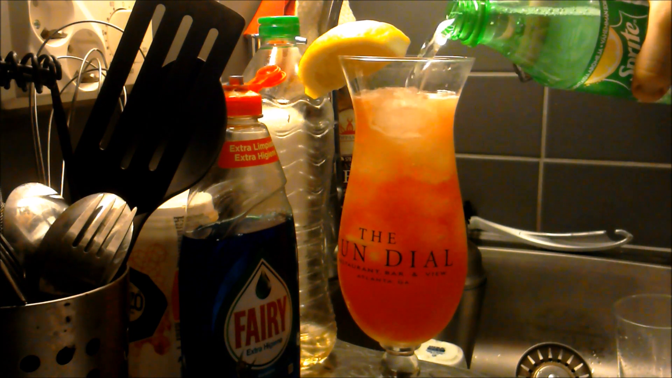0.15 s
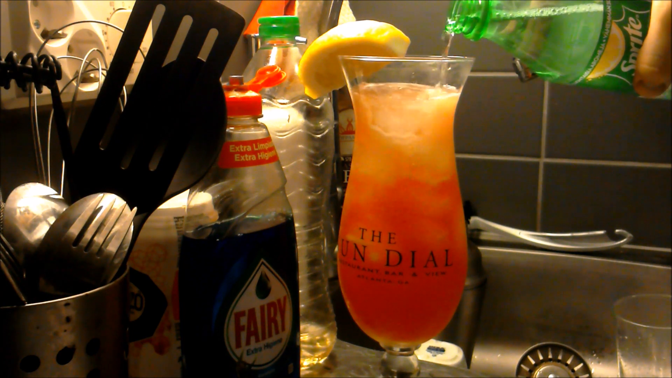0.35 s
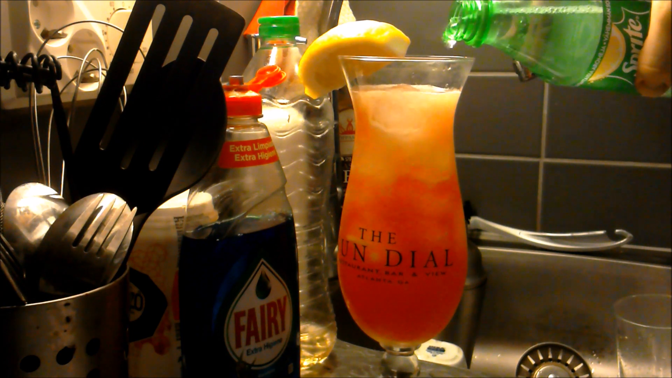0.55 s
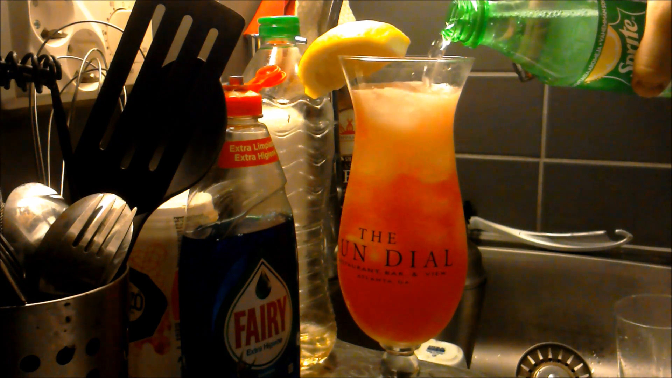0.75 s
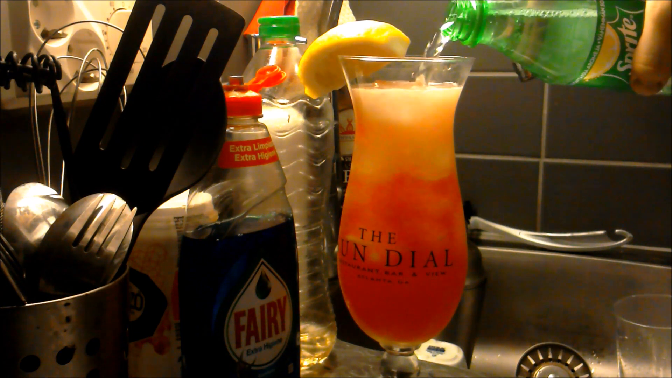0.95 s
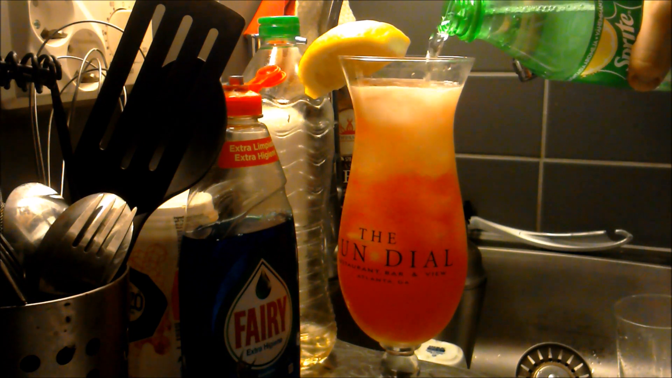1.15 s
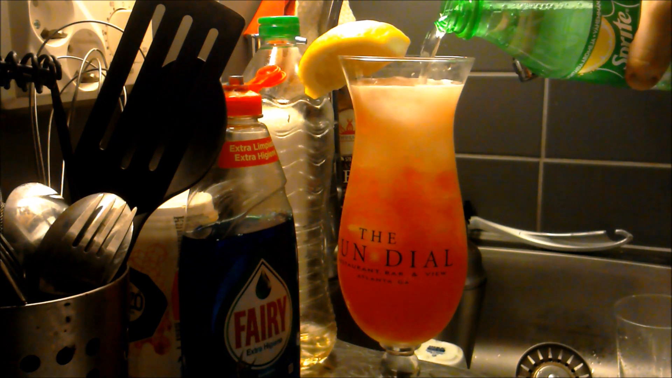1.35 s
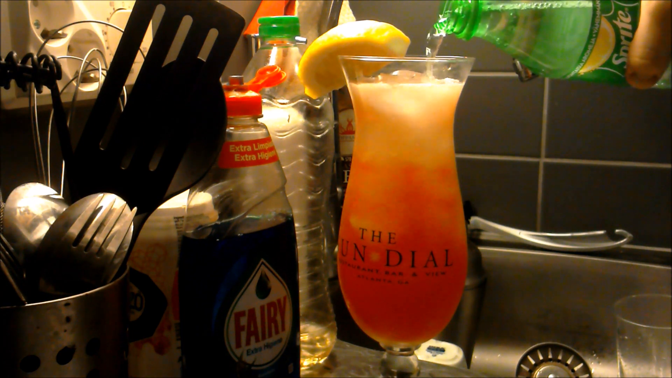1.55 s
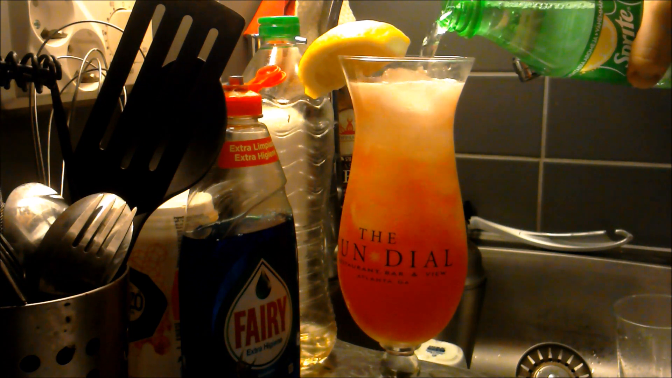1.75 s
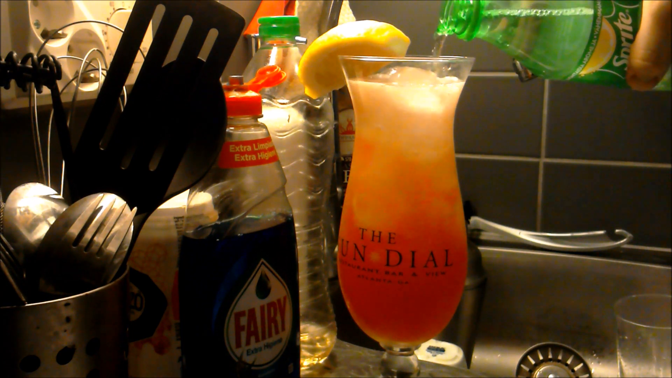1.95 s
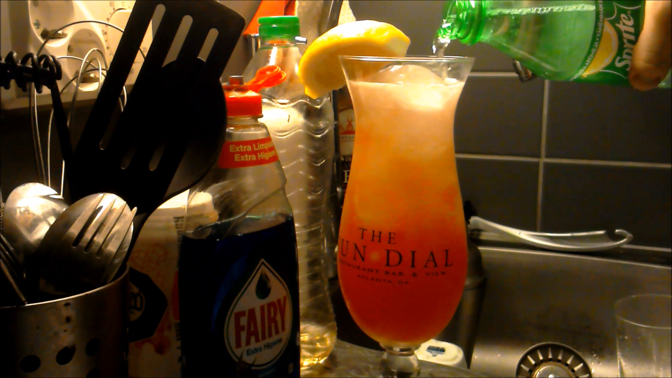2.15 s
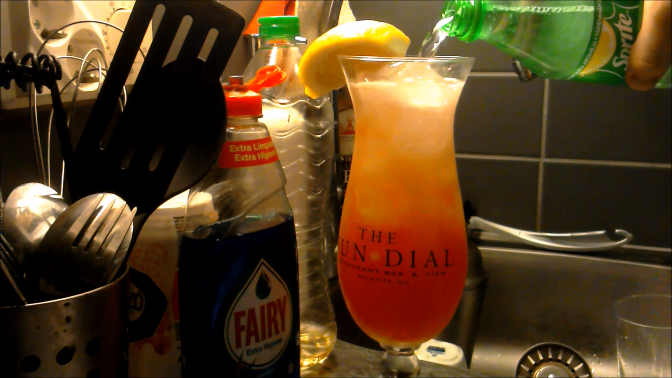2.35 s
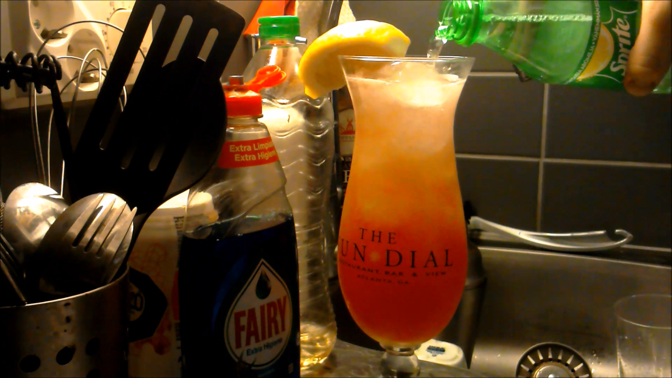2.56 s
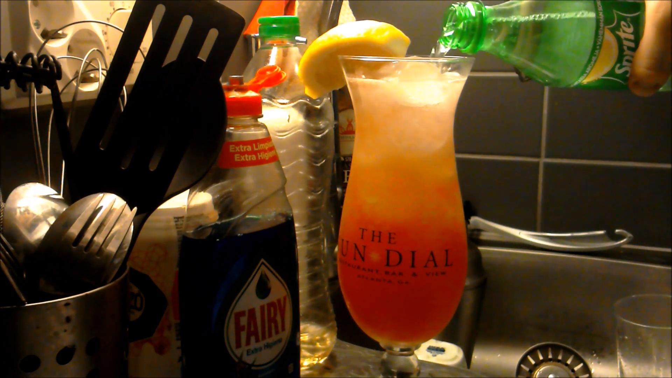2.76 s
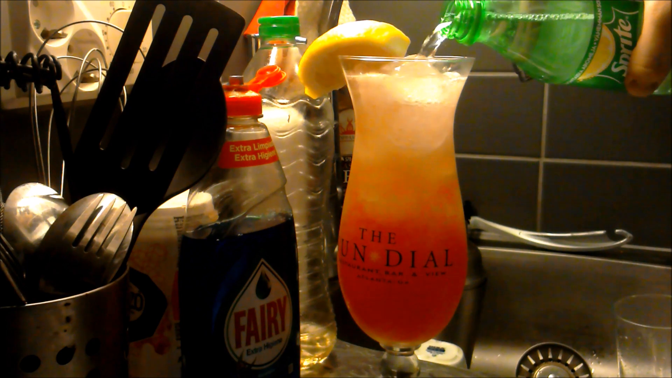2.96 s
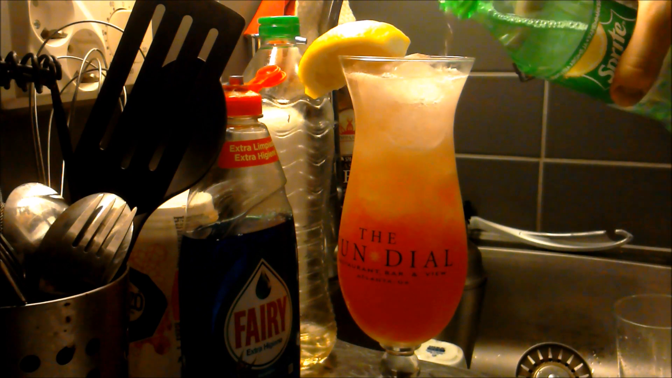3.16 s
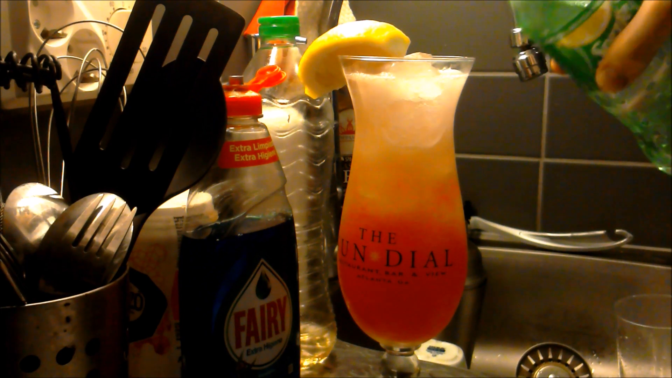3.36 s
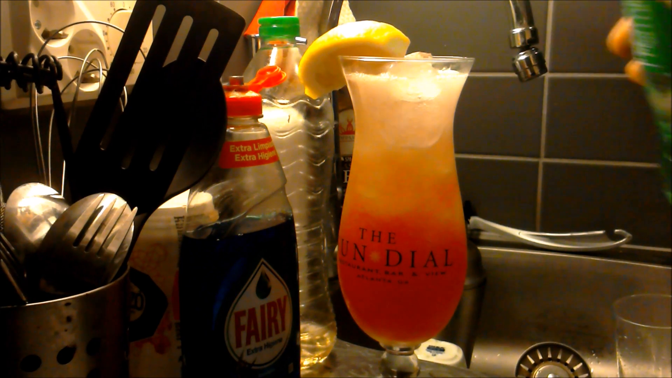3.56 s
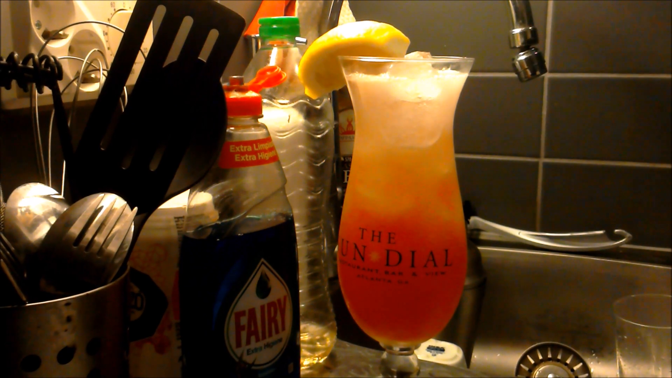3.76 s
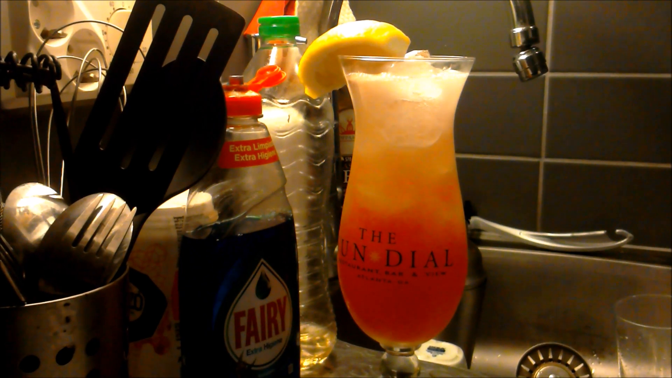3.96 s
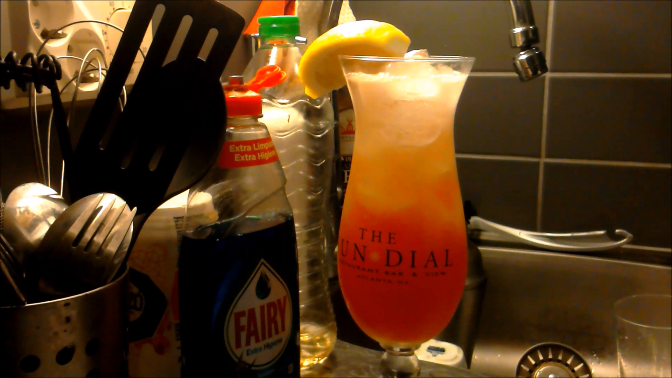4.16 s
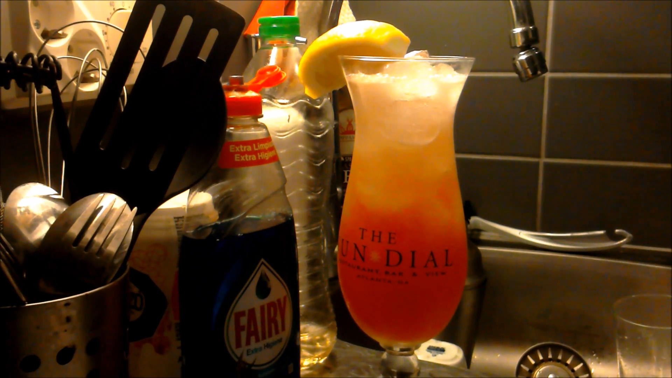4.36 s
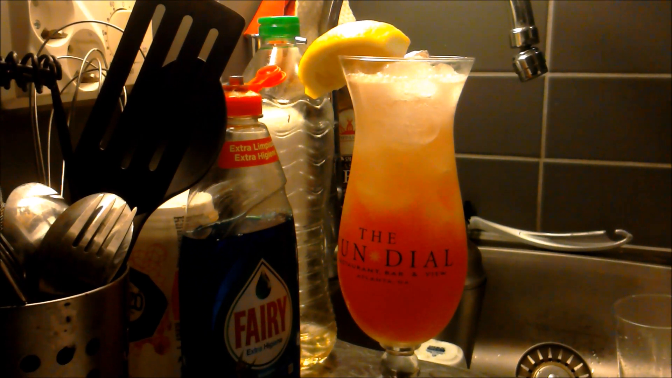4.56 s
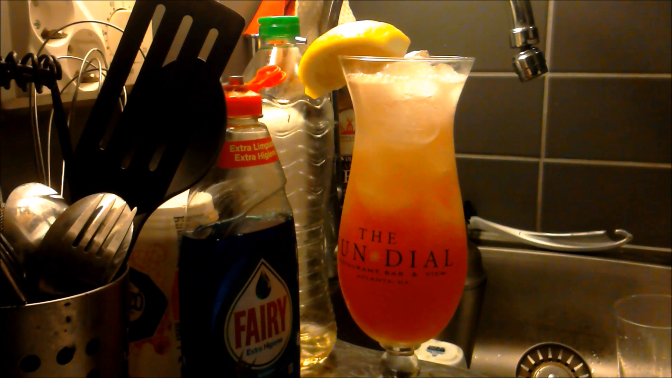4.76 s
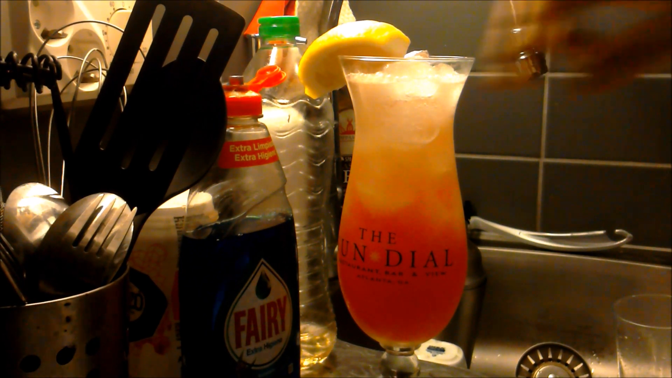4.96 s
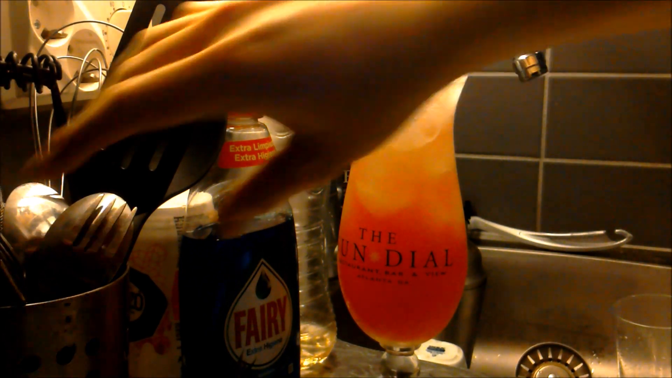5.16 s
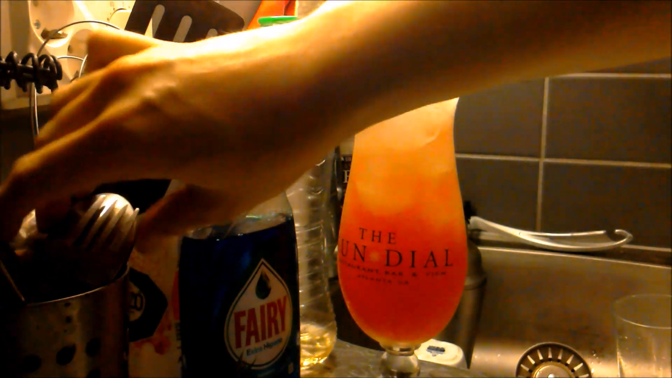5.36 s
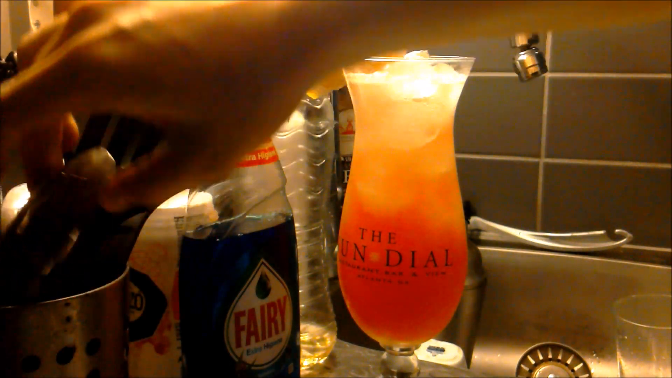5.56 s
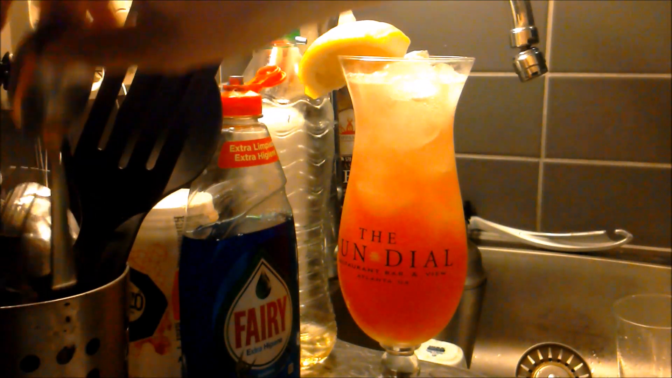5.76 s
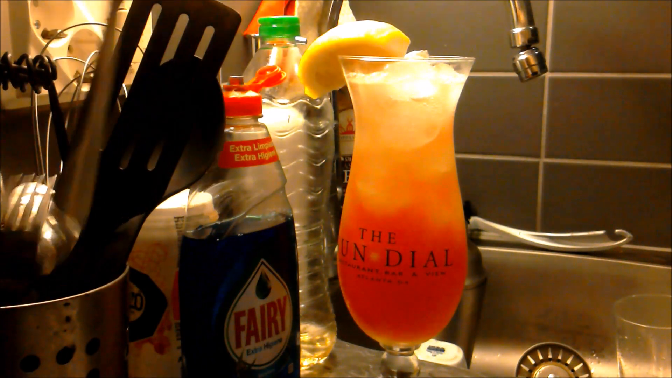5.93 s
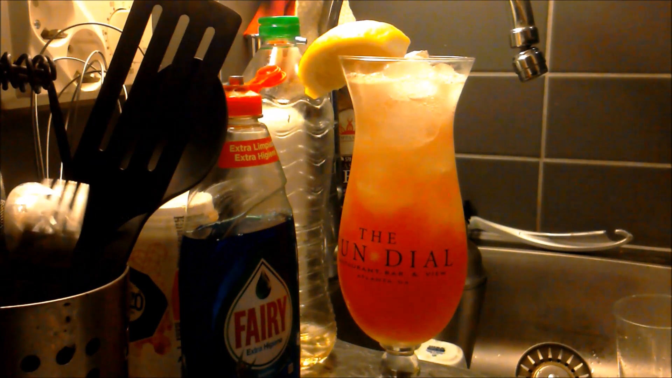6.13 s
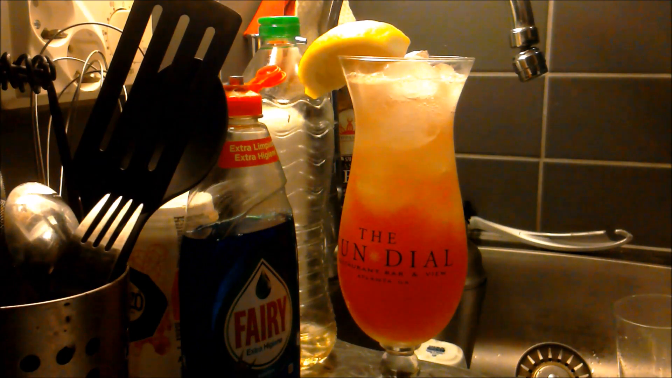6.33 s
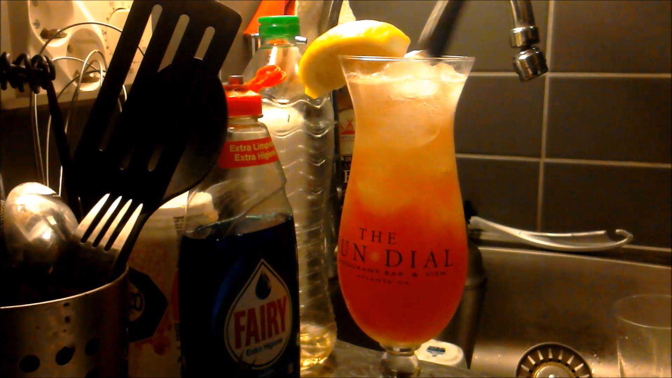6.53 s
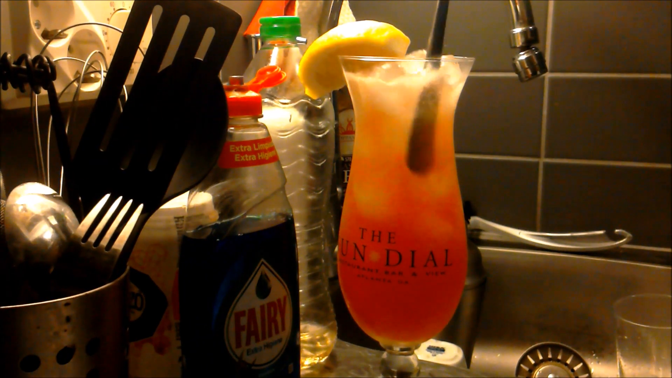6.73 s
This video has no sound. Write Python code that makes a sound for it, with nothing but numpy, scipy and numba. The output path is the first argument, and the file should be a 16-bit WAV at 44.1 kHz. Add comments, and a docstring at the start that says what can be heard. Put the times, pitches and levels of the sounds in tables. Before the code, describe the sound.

Quiet glugging of a soft drink over ice, a couple of thuds, a harsh bright rattle of steel utensils, then a stirrer jabbing into ice cubes.

```python
"""A fizzy drink glugs from a bottle into a tall glass of ice by a kitchen sink: noise splash and gliding rings.
Soft bumps come through the cupboards, the bottle is set down and the ice settles: ringing panels and clinks.
A hand pulls a steel utensil out of a crowded pot; the cutlery scrapes, rings and drops back: noise through
hundreds of modes, and free decaying sines. Last, the utensil is pushed down among the ice cubes.
Fizz and hum lie under it all; a close microphone clips the loudest moments."""
import sys
import numpy as np
from scipy import signal
from scipy.fft import rfft, irfft, next_fast_len
from scipy.io import wavfile
from scipy.ndimage import uniform_filter1d
from numba import njit

SR = 44100
rng = np.random.default_rng(int(sys.argv[2]) if len(sys.argv) > 2 else 0)


def unload_wav(signal):
    """Save mono or channel-first audio to the path in sys.argv[1] as 16-bit WAV at rate SR, clipped to [-1, 1]."""
    wavfile.write(
        sys.argv[1],
        SR,
        np.round(np.clip(np.atleast_2d(signal).T, -1, 1) * 32767).astype(np.int16),
    )


N = 303849
T = np.arange(N) / SR

# knock spectrum of a hard top: f/Hz, relative level/dB
HARD_KNOCK = [(150, -1), (400, 4), (900, 0.5), (1500, -14), (3000, -21.5), (12000, -33)]
# modes of the free utensil: f/Hz, relative level/dB, full ring t60/s
STEEL = [(2900, -19, .09), (3680, -18, 0.27), (4275, -11, .25), (5582, -12, 0.35), (6541, -11, 0.4),
         (7784, -7, 0.4), (8909, 2, 0.1), (9243, -5, 0.12), (10170, -4, 0.25), (10720, -9, 0.45),
         (11630, -4, .2), (13090, -3, .16), (14590, -20, 0.25), (15500, -9, 0.28)]
# sliding steel: t/s, level/dB
SCRAPE = [(5.35, -74), (5.38, -23.5), (5.408, -17.5), (5.43, -22), (5.46, -20), (5.494, -16.5),
          (5.56, -11.5), (5.59, -9), (5.6, -17.5), (5.63, -15), (5.695, -13), (5.735, -38), (5.85, -40)]


def undb(db):
    """Decibels to amplitude."""
    return 10 ** (np.asarray(db) / 20)


def curve(rows, edge_db=None):
    """A (t/s, level/dB) envelope at every sample; edge_db applies outside its span."""
    t, db = np.transpose(rows)
    return np.interp(T, t, db, edge_db, edge_db)


def colour(x, points):
    """Equalises x through (f/Hz, level/dB) points, then sets its rms to 1."""
    hz, db = np.transpose(points)
    size = next_fast_len(len(x))
    f = np.maximum(np.arange(size // 2 + 1) * SR / size, 1)
    gain = undb(np.interp(np.log(f), np.log(hz), db))
    y = irfft(rfft(x, size) * gain, size)[:len(x)]
    return y / np.std(y)


def split(x, hz):
    """The parts below and above hz, each at rms 1."""
    low = signal.lfilter(*signal.butter(2, hz, fs=SR), x)
    high = signal.lfilter(*signal.butter(2, hz, "high", fs=SR), x)
    return low / np.std(low), -high / np.std(high)  # opposite sign: the parts join without a notch


def walk(rate):
    """A wandering level: random values, rate per second, slewed into one another."""
    k = int(SR / rate)
    steps = np.repeat(rng.standard_normal(N // k + 1), k)
    return 1.2 * uniform_filter1d(steps, k)[:N]


@njit
def rings(n, sr, s, hz, gain, t60, glide, phase):
    """Decaying sines; glide is the fractional pitch rise over t60."""
    out = np.zeros(n)
    for k in range(len(s)):
        start, length = int(s[k] * sr), int(t60[k] * sr)
        w = 2 * np.pi * hz[k] / sr
        p = np.exp(1j * w - np.log(1000.) / length)
        turn = np.exp(1j * w * glide[k] / length)
        z = gain[k] * np.exp(1j * phase[k])
        for i in range(start, min(n, start + length)):
            out[i] += z.imag
            z *= p
            p *= turn
    return out


def ring(s, hz, db, t60, glide=0., phase=0.):
    """Sums decaying sines over every combination of the broadcast settings."""
    settings = np.broadcast_arrays(s, hz, db, t60, glide, phase)
    s, hz, db, t60, glide, phase = (np.ravel(a) * 1. for a in settings)
    return rings(N, 1. * SR, s, hz, undb(db), np.maximum(t60, .002), glide, phase)


def bursts(noise, s, db, t60, rise_s):
    """Puffs of the noise that rise fast and die away by 60 dB over t60."""
    out = np.zeros(N)
    for start, level_db, decay in zip(s, db, np.broadcast_to(t60, np.shape(s))):
        i = int(start * SR)
        t = T[:min(N - i, int(decay * SR) + 9)]
        envelope = undb(level_db - 60 * t / decay) * (1 - np.exp(-t / rise_s))
        out[i:i + len(t)] += noise[i:i + len(t)] * envelope
    return out


def bubbles(rows, count, low_hz, octaves, spread_db, cycles):
    """A shower of small bubbles, each gliding up in pitch, whose levels follow a (t/s, level/dB) envelope."""
    chance = rng.random((count, 3)).T
    s = rows[0][0] + (rows[-1][0] - rows[0][0]) * chance[0]
    hz = low_hz * 2 ** (octaves * chance[1])
    db = curve(rows)[np.minimum(s * SR, N - 1).astype(int)]
    db = db - spread_db * np.log(np.maximum(chance[2], .05))  # a few stand out louder
    return ring(s, hz, db, cycles / hz, glide=0.6)


def thud(blows, modes, knock, rise_s, knock_t60):
    """Soft blows on a panel: its modes ring and a dull knock dies away over them."""
    s, db, knock_db, free = np.transpose(blows)
    hz, mode_db, mode_t60 = np.transpose(modes)
    phase = np.pi * np.arange(len(hz))  # neighbouring modes start in opposite sense
    body = ring(s[:, None], hz, db[:, None] + mode_db, mode_t60 * free[:, None], phase=phase)
    push = np.hanning(int(rise_s * SR))  # a soft contact pushes for a while
    body = np.convolve(body, push / push.sum())[:N]
    noise = colour(rng.standard_normal(N), knock)
    return body + bursts(noise, s, db + knock_db, knock_t60 * free, rise_s)


def bed():
    """Fine bubbles burst on the drink as grainy noise, over the low hum of the room."""
    # spectrum of the bursting bubbles: f/Hz, relative level/dB
    fizz_spectrum = [(530, -5.5), (1420, -7.5), (2070, -7.5), (3780, -5), (4500, -4), (4830, 1),
                     (5300, -4.5), (6400, 0.5), (7100, -3), (7850, 0.5), (8900, -2), (9800, 2),
                     (10800, -.5), (11700, 1.5), (13300, -5.5), (15800, -2)]
    # spectrum of the room hum: f/Hz, relative level/dB
    hum_spectrum = [(12, -55), (20, 10), (98, 7.5), (151, -0.5), (188, 4), (221, -30), (285, -5.5),
                    (341, -28), (439, -3), (566, -16), (702, -12.5), (1370, -16), (1500, -23), (1950, -48),
                    (3300, -120)]
    # slow balance of the hum: t/s, level/dB
    hum_level = [(.4, 2), (1.0, 0), (1.3, -2.5), (2.2, 3.5), (2.9, -3), (3.3, -7.5), (5.2, -2.5),
                 (6.0, 13.5), (6.5, -3)]
    # the bed steps to a new level, holds, then sags: t/s, level/dB, hold/s
    openings = [(0, -86.5, 0.89), (0.666, -62.5, 0.11), (0.829, -61, 0.12), (0.982, -56.5, .01),
                (1.147, -57, 1.26), (2.617, -57, 0.45), (3.187, -54.5, 0.026), (3.323, -58.5, 0.21),
                (3.602, -53, 2), (5.26, -54.5, 2)]
    sag_db_per_s = 65
    current = np.searchsorted(np.array(openings)[1:, 0], T)
    opens, db, holds = np.transpose(openings)[:, current]
    grain_db = 0.68 * rng.exponential(size=N // 40 + 1).repeat(40)[:N]
    pops = rng.standard_normal(N) * undb(grain_db)
    fizz = colour(pops, fizz_spectrum) * undb(3.5 + 0.3 * walk(16))
    hum = colour(rng.standard_normal(N), hum_spectrum) * undb(2 * walk(3.72) + curve(hum_level))
    sag_db = sag_db_per_s * np.maximum(T - opens - holds, 0)
    return (fizz + hum) * undb(db - sag_db)


def cupboard():
    """Heavy, soft bumps come through the cupboards: low panel modes and a muffled knock."""
    # bumps: t/s, level/dB, knock against level/dB, share of the full ring time
    bumps = [(1.14, -41, -26, 0.35), (1.19, -53, -20, 1), (2.609, -21, -10, 1), (2.637, -24, -13.5, 0.62)]
    # cupboard modes: f/Hz, relative level/dB, full ring t60/s
    modes = [(44.7, -8.5, 0.78), (71.4, -17, 0.69), (102, -17, 0.74), (126.6, 1, 0.45), (165.5, 2.5, 0.35),
             (319, 2, 0.25), (416, 7, 0.37), (840, 9, .2)]
    # knock spectrum of a soft cupboard: f/Hz, relative level/dB
    soft_knock = [(150, 3.5), (400, 5.5), (800, -8), (1100, -24.5), (1600, -29), (12000, -73)]
    return thud(bumps, modes, soft_knock, rise_s=0.0058, knock_t60=0.37)


def worktop():
    """The bottle set down and the jolted glass excite the modes of the worktop with a hard knock."""
    # blows: t/s, level/dB, knock against level/dB, share of the full ring time
    thumps = [(3.19, -59, 8, 0.22), (4.195, -15.5, -13.5, 0.85), (4.203, -48, 1, 0.23),
              (4.21, -11, -42, 0.66), (4.275, -21, -42, 0.86), (4.328, -27, -37, 1),
              (6.477, -9, -8.5, 0.32), (6.578, -16.5, -8, 0.29), (6.7, -37.5, -25, 1),
              (6.81, -38.5, -22, 0.65)]
    # worktop modes: f/Hz, relative level/dB, full ring t60/s
    modes = [(88.7, -2, 0.39), (106.5, -5.5, 0.82), (133.2, 1, 0.3), (162.6, 1, 0.27), (207, -19, 0.4),
             (410, -12, 0.6), (553, -22.5, 0.4), (797, -29, .2)]
    return thud(thumps, modes, HARD_KNOCK, rise_s=0.0025, knock_t60=0.38)


def drainer():
    """The pot rocks on the steel drainer, whose low modes boom under a hard knock."""
    # rocks of the pot: t/s, level/dB, knock against level/dB, share of the full ring time
    rocks = [(5.66, -36.5, 4, 0.88), (5.988, -25, -27, 1), (6.17, -32.5, -25, 0.26)]
    # drainer modes: f/Hz, relative level/dB, full ring t60/s
    modes = [(58.5, 3.5, 1.17), (98.6, -3, 0.68), (169, 7.5, 0.52), (284, -14, 0.72), (326, -27, 1.1),
             (485, 3.5, 0.29)]
    return thud(rocks, modes, HARD_KNOCK, rise_s=0.0022, knock_t60=0.34)


def pour():
    """A patchy, gurgling splash; each gulp is two short wet rings, a spatter and a crisp tick."""
    # liquid falling on the ice: t/s, level/dB
    fall = [(.66, -63.5), (1.1, -76), (1.2, -63.5), (1.5, -58.5), (1.7, -56.5), (1.95, -54.5), (2.1, -56),
            (2.35, -84), (2.6, -82)]
    # splash spectrum: f/Hz, relative level/dB
    splash_spectrum = [(120, -19), (200, -6), (241, -62), (285, 8), (402, -23), (700, 1.5), (854, -4.5),
                       (1270, -2), (2090, -6.5), (2280, -38), (6000, -48)]
    # gulps and knocks of floating ice: t/s, level/dB, low ring f/Hz, high ring f/Hz,
    # high ring against level/dB
    glugs = [(0.726, -49, 606, 1790, 15), (0.89, -43.5, 683, 1780, -0.5), (0.984, -34.5, 715, 1090, -6),
             (1.187, -30.5, 1010, 1240, -0.5), (1.22, -38.5, 1000, 1250, 8), (1.252, -35, 607, 1240, -14),
             (1.333, -34, 710, 1640, -3.5), (1.374, -43, 754, 1400, 6.5), (1.415, -24, 680, 1700, -8),
             (1.487, -38, 1050, 1260, 14), (1.559, -41.5, 690, 1220, 3), (1.584, -31.5, 1040, 1260, 4),
             (1.622, -37, 700, 1330, 1), (1.647, -34.5, 662, 1390, 3), (1.665, -37.5, 670, 1410, 6),
             (1.734, -41.5, 716, 1240, 8), (1.791, -36, 616, 1340, -0.5), (1.837, -31.5, 607, 1260, -2),
             (1.873, -40, 990, 1260, 11.5), (1.909, -39.5, 600, 1250, -8), (1.944, -35.5, 1010, 1260, 2.5),
             (1.963, -42, 694, 1410, 10), (2.086, -40.5, 972, 1370, -11), (2.132, -42.5, 704, 1300, 1.5),
             (2.234, -42, 713, 1280, -1)]
    s, db, low_hz, high_hz, high_db = np.transpose(glugs)
    low = ring(s, low_hz, db - 11.5, 0.079, glide=0.034)
    high = ring(s + 0.000865, high_hz, db + high_db - 12.0, 0.059, glide=0.05)
    splash = colour(rng.standard_normal(N), splash_spectrum)
    dull = split(splash, hz=1700)[0]
    spatter = bursts(dull, s, db - 16.5, 0.13, rise_s=0.0012)
    crisp_spectrum = [(900, -4), (1600, 10.5), (2600, -2.0), (4500, -7), (8000, -9.5)]
    crisp = colour(rng.standard_normal(N), crisp_spectrum)
    ticks = bursts(crisp, s, db + high_db - 13, 0.057, rise_s=0.00079)
    gurgle = undb(-4.5) * bubbles(fall, count=500, low_hz=524.0, octaves=2.6, spread_db=3.0, cycles=46)
    stream = splash * undb(curve(fall, edge_db=-120) - 5.5 + 3.6 * walk(39.47))
    return gurgle + stream + low + high + spatter + ticks


def ice():
    """Cubes clink and crunch through the damped glass, with a duller body and the slosh of the drink."""
    # ice cracks, settles and knocks the glass: t/s, level/dB, bright part against level/dB,
    # low body against level/dB
    cubes = [(3.026, -34, -7, -14), (3.622, -47, 16, -31), (4.206, -35.5, -1, 18.5), (4.229, -42, 2, 5),
             (4.271, -33, -12, -8), (4.32, -38, -16, -12), (4.44, -41, -14.5, -2), (6.478, -5.5, 9, 0.5),
             (6.518, -17.5, 10, -12), (6.528, -17.5, 6.5, 2.5), (6.538, -29, -7, -18),
             (6.567, -14.5, -11, -20), (6.578, -12.5, -8, -13), (6.609, -13.5, -12, -1),
             (6.641, -15.5, -17, -7), (6.652, -9.5, -27, -26), (6.693, -37, -20, -9), (6.698, -20, -10, -7),
             (6.714, -24.5, -15, -9), (6.766, -38, 2, -26), (6.79, -48, 9, -19), (6.86, -24, -13, -9.5)]
    # modes of the full glass: f/Hz, relative level/dB, t60/s as clinks, cut short inside the crunch
    glass = [(720, -10.5, 0.1), (1270, -14, .08), (2494, -4, 0.027), (3320, -8.5, 0.024), (4180, 2, 0.032),
             (4830, -5.5, 0.15), (5810, -2.5, 0.058), (6300, -11, 0.071), (8750, -8, 0.051),
             (10550, -5, 0.044), (12200, -1, 0.035)]
    # drink sloshing round the cubes: t/s, level/dB
    slosh = [(6.47, -75), (6.55, -32), (6.7, -35), (6.77, -41.5), (6.83, -32.5), (6.89, -42.5)]
    crunch_t60 = 0.082  # s
    s, db, bright_db, low_db = np.transpose(cubes)
    mode_hz, mode_db, mode_t60 = np.transpose(glass)

    white_spectrum = [(700, -30), (1600, -6), (4500, 0), (9000, -3), (12000, -6), (16000, -11)]
    white = colour(rng.standard_normal(N), white_spectrum)
    damped = ring(0, mode_hz, mode_db, .25 * mode_t60)[:SR // 10]
    rung = signal.fftconvolve(white, damped)[:N]
    dull, bright = split(white + 0.7 * rung / np.std(rung), hz=5700)
    crunch = bursts(dull, s, db - 12.0, crunch_t60, rise_s=0.00022)
    crunch += bursts(bright, s, db + bright_db - 8.5, 0.98 * crunch_t60, rise_s=0.00068)

    # loose ice splits each mode into a rough cluster of three
    pick = rng.standard_normal((len(s), 2, 3, len(mode_hz)))
    cluster_hz = mode_hz * (1 + .03 * pick[:, 0])
    cluster_db = db[:, None, None] - 23.5 + mode_db + 3 * pick[:, 1]
    clink = ring(s[:, None, None], cluster_hz, cluster_db, mode_t60, phase=9 * pick[:, 1])

    wet_spectrum = [(200, -2.0), (600, -6.5), (1200, 0.0), (2200, -8.5), (5000, -26.0)]
    wet = colour(rng.standard_normal(N), wet_spectrum)
    body = bursts(wet, s, db + low_db - 12.5, 1.41 * crunch_t60, rise_s=0.00083)
    gurgle = undb(-8) * bubbles(slosh, count=120, low_hz=476, octaves=2.32, spread_db=1.0, cycles=17)
    wash = wet * undb(curve(slosh, edge_db=-120) - 5.0 + 0.79 * walk(50))
    return crunch + clink + body + gurgle + wash


def rattle():
    """While the steel slides it catches and slips: uneven small clinks, each on a few chance modes."""
    count, size = 70, 7  # clinks, modes in each
    when = rng.random((count, 2)).T
    pick = rng.random((2, count, size))
    s = SCRAPE[1][0] + (SCRAPE[-2][0] - SCRAPE[1][0]) * when[0]
    db = curve(SCRAPE)[(s * SR).astype(int)] - 9 * when[1] - 6.5
    hz = 550 * 2 ** (4.2 * pick[0])
    mode_db = db[:, None] + 5.3 * np.log2(hz / 6000) - 8 * pick[1]  # brighter upwards
    return ring(s[:, None], hz, mode_db, 0.07)


def cutlery():
    """Each clash is a dense crash plus the modes of whichever pieces meet; sliding keeps the crash going."""
    # clashes: t/s, level/dB, dull part against level/dB, decay/s (scaled for each layer)
    clashes = [(5.086, -31, 2, 0.032), (5.2404, -15, 3.5, 0.093), (5.313, -33, 15, 0.093),
               (5.345, -11.5, 1, 0.12), (5.413, 13.5, -9.5, 0.1), (5.4335, 4, -39, 0.19),
               (5.4983, 6.5, -44, 0.37), (5.535, 0.5, -19, 0.32), (5.6069, 3, -36, 0.28),
               (5.6426, -1, 0, 0.054), (5.673, 6, -9.5, 0.14), (5.7304, -18.5, 1.5, 0.093),
               (5.8542, -17.5, 9, 0.039), (5.877, -19, 8, 0.16), (5.891, -0.5, -2.5, 0.074),
               (6.111, -35, 16, 0.085), (6.1613, -17.5, 7.5, 0.21), (6.17, 17.5, 2, 0.029),
               (6.1843, 11, -10.5, 0.094), (6.2975, -25, -9, 0.069)]
    # crash spectrum: f/Hz, relative level/dB
    crash_spectrum = [(180, -8.5), (300, -7.5), (624, -13), (762, -6), (1080, -4), (1340, -6), (1720, -12),
                      (2030, -2), (2440, -6), (3640, -0.5), (5710, 1), (10100, 7), (13000, 7), (15900, 0.5)]
    # modes of the steel pot: f/Hz, level against the dull part/dB, t60/s
    pot = [(2019, -56, .3), (4527, -42, .2), (4800, -45, .25), (6164, -38, .15), (6557, -43, .33),
           (6804, -48, .22), (7634, -45, .19), (8220, -41, .14)]
    s, db, dull_db, t60 = np.transpose(clashes)

    # the crowded pot holds hundreds of short, overlapping modes
    chance = rng.random((260, 3)).T
    crowd = ring(0, 600 + 15400 * chance[0], 14 * chance[1], 0.031 + 0.059 * chance[2])[:SR // 4]
    steel_hz, steel_db, steel_t60 = np.transpose(STEEL)
    held = ring(0, steel_hz, steel_db + 20, .3 * steel_t60)[:SR // 4]  # damped by its neighbours
    grain = np.minimum(rng.exponential(size=N // 30 + 1), 4).repeat(30)[:N]
    grit = rng.standard_normal(N) * undb(2 * grain)
    rung = signal.fftconvolve(grit, crowd + held)[:N]
    crash = colour(rung / np.std(rung) + .75 * rng.standard_normal(N), crash_spectrum)
    dull, bright = split(crash, hz=6440)
    out = bursts(bright, s, db - 13.5, 0.97 * t60, rise_s=0.0027)
    out += bursts(dull, s, db + dull_db - 17.0, 1.81 * t60, rise_s=0.00057)

    # other pieces, other modes at every clash
    pick = rng.random((3, len(s), 60))
    piece_hz = 3400 + 12300 * pick[0]
    piece_db = db[:, None] - 33 - 8 * pick[1]
    piece_t60 = t60[:, None] * (.7 + .9 * pick[2]) * (7000 / piece_hz) ** 0.7  # high modes die sooner
    out += ring(s[:, None], piece_hz, piece_db, piece_t60, phase=50 * pick[1])

    pot_hz, pot_db, pot_t60 = np.transpose(pot)
    shake = rng.standard_normal((len(s), len(pot)))
    struck_db = (db + dull_db)[:, None] + pot_db + 3 * shake
    out += ring(s[:, None], pot_hz, struck_db, pot_t60, phase=9 * shake)
    return out + crash * undb(curve(SCRAPE, edge_db=-120) + walk(70))


def utensil():
    """The free steel piece sounds its clear modes, a little differently at each blow."""
    # blows on the utensil in the hand: t/s, level/dB, share of the full ring time, tilt/(dB per octave)
    chimes = [(5.243, -31, 0.19, 9), (5.343, -28.5, 0.22, 18), (5.501, -18, 0.46, -12), (5.61, -24, 0.4, 6),
              (5.73, -24.5, 1, 5), (5.766, -24.5, 1, -2), (5.896, -28, 0.6, -19.5)]
    s, db, free, tilt_db = np.transpose(chimes)[:, :, None]
    hz, mode_db, mode_t60 = np.transpose(STEEL)
    scatter = rng.standard_normal((len(s), len(hz)))
    db = db + mode_db + tilt_db * np.log2(hz / 7000) + 2.5 * scatter
    t60 = np.minimum(mode_t60 * free, .45)
    twin_hz = hz + 15.7 * hz / 7000  # each mode beats with a near twin, 15.7 Hz away at 7 kHz
    main = ring(s, hz, db, t60, phase=9 * scatter)
    twin = ring(s, twin_hz, db - 6, t60, phase=31 * scatter)
    return main + twin


def kitchen(x):
    """Tiled walls return a short diffuse tail; the treble dies first."""
    tail_t60, return_db = 0.36, -21  # s for the part below 6 kHz, dB
    t = T[:int(tail_t60 * SR)]
    dull, bright = (part[:len(t)] for part in split(rng.standard_normal(N), hz=6000))
    tail = dull * undb(-60 * t / tail_t60)
    tail += 0.63 * bright * undb(-60 * t / (0.36 * tail_t60))
    tail *= (t > .004) / np.sqrt(len(t))  # 4 ms gap before the walls answer
    return signal.fftconvolve(x, tail)[:N] * undb(return_db)


def scene():
    """Near sources with their room tail, over the struck panels and the bed."""
    near = pour() + ice() + rattle() + cutlery() + utensil()
    panels = cupboard() + worktop() + drainer()
    return (near + kitchen(near) + panels + bed())[None]


def record(dry):
    """The capsule drops the deepest bass, the input clips just under full scale and the top is cut."""
    capsule = signal.lfilter(*signal.butter(3, 42, "high", fs=SR), dry)
    clipped = np.clip(capsule, -.93, .93)
    top_cut = signal.ellip(12, .2, 80, 15800, fs=SR, output="sos")
    return signal.sosfilt(top_cut, clipped)


dry = scene()
out = record(dry)
unload_wav(out)
```